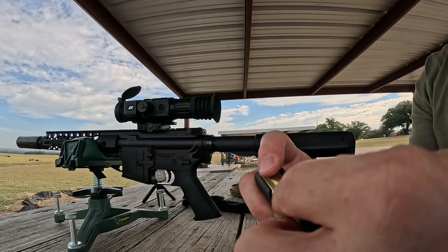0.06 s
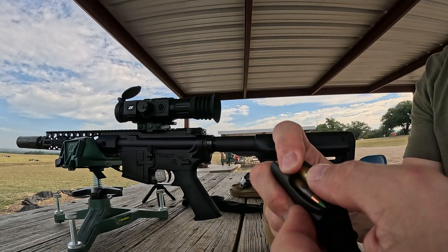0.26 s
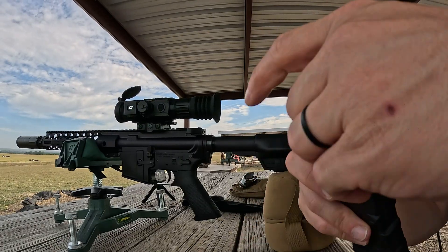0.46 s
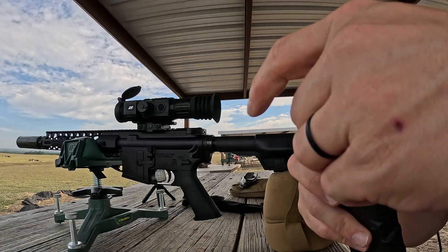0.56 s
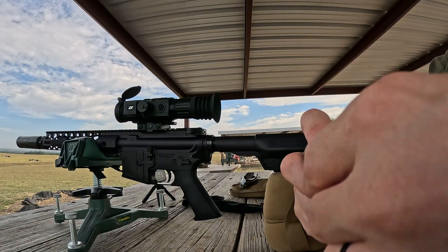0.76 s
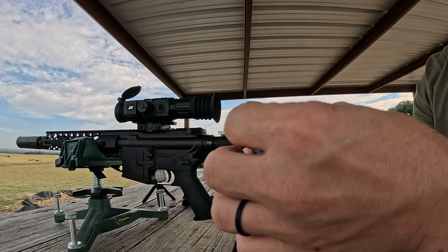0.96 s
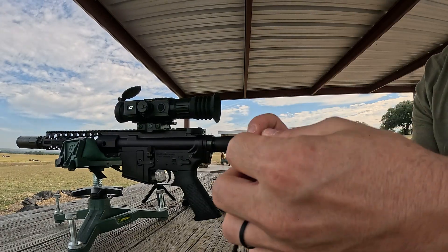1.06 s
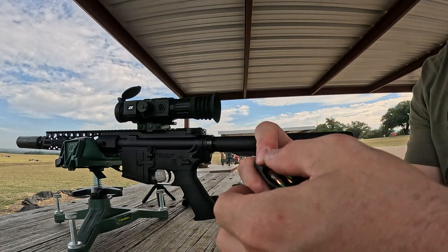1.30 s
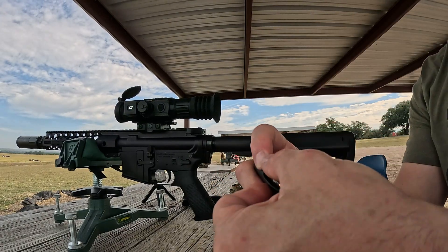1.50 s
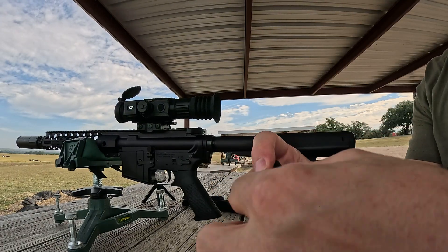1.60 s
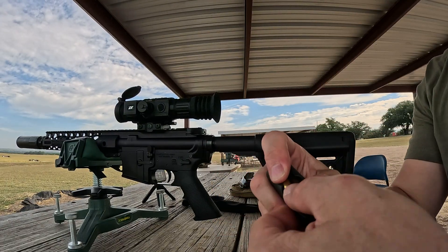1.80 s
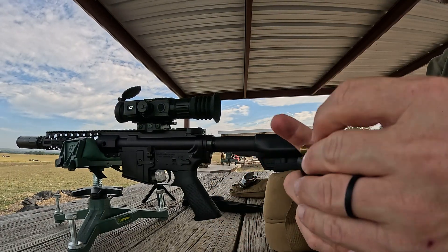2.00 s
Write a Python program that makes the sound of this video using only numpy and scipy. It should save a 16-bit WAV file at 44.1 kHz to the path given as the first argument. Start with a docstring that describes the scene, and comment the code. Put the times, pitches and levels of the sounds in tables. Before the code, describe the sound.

Sharp metal clicks as rounds are thumbed into a rifle magazine outdoors, up close.

```python
"""Under the roof of a shooting range, cartridges are thumbed into a rifle magazine near the microphone.
Each round clicks against the feed lips (the metal edges that hold it in), then snaps under them
and sets the spring and the stacked rounds rattling. Fingers rub on the magazine, and the roof
sends back a short tail of sound. Behind it is steady outdoor air, with a breeze that blows
on the microphone most strongly near the end."""
import sys
import numpy as np
from scipy import signal
from scipy.fft import rfft, irfft
from scipy.io import wavfile
from scipy.ndimage import uniform_filter1d

SR = 44100
rng = np.random.default_rng(int(sys.argv[2]) if len(sys.argv) > 2 else 0)


def file_out(sig):
    """Save sig as 16-bit WAV at sys.argv[1]."""
    # one column per channel
    cols = np.atleast_2d(sig).T
    # limit, then scale
    lim = np.clip(cols, -1, 1)
    pcm = np.round(lim * 32767).astype(np.int16)
    wavfile.write(sys.argv[1], SR, pcm)


N = 90404

# Brass touching the magazine. Bass, knock, treble and top turn parts of the tone up or down.
# (time [s], contact length [s], level [dB], bass [dB], knock [dB], treble [dB], top [dB], ring [dB])
BRASS_CLICKS = [ (.0368, 0.0015, -32, 12, 3, -18, -16, -5), (0.0426, 0.0029, -29.5, -6, -17, -15, -18, -7),
                (0.0566, .0005, -38.5, -17, -13, 7.5, 10, -5),
                (0.063, .001, -38.5, 13.5, 6.5, -8, -10, -16), (.1205, 0.00077, -52, -6, 17, -5, -4, -3),
                (0.1574, 0.0048, -40.5, 4, 8.5, 4, 8.5, -5), (0.164, .0005, -33.5, 1.5, -2, -20, -13, -12),
                (0.242, 0.00079, -16, -14, -3.5, -18, -1, -12), (0.2464, 0.0008, -26.5, -7, 10, 7, 5, -5),
                (0.2507, 0.0028, -16, -0.5, -7, 2.5, 3, -11), (0.257, 0.0018, -13, -4, 1.5, -10, -2, 3.5),
                (0.2873, 0.00072, -21, -24, -3, 5.5, 10, -1), (0.294, .001, -18.5, -22, -4, -5, 3, -3),
                (.3345, .001, -38, -17, -8, -10, -11, 12), (.428, .001, -23, 3.5, 0, 0.5, 2.5, -9),
                (.431, 0.00084, -15, -13, -6, -6, -7, -20), (0.4398, 0.0015, -14, -9, -2.5, -10, -4, -17),
                (0.4989, 0.0016, -14, -10.5, -3, 2, 0.5, 1), (.5073, 0.00073, -20.5, -16, 6, -12, -1, 0),
                (0.595, 0.00082, -36.5, -6, 8.5, -8, 7, 2),
                (0.611, 0.0025, -25.5, -2.5, -5, -2.5, -8.5, 0.5),
                (0.702, .001, -36, -17, 8.5, -11, -11, 4), (.7233, 0.0008, -32, -4, -3, -3.5, -5, 10.5),
                (0.749, 0.0031, -15.5, -0.5, -6, 6, 1.5, -25), (.756, 0.0065, -15, 0, 0, -1.5, -4, 4.5),
                (0.7663, 0.0013, -32.5, 11.5, 9, 10, 16, 6), (0.778, 0.00077, -33.5, -4, 5, 2, 8, -2),
                (0.998, 0.0012, -32, 4, 5.5, -6, -2, -34), (1.0638, 0.0013, -15.5, -5.5, -7, -8, -6, -0.5),
                (1.083, 0.0008, -18, -21, -8, 5.5, 5.5, 2), (1.109, 0.0011, -18, -9.5, -3.5, 5.5, 13, 9),
                (1.22, 0.0027, -43, 12.5, 0.5, -2, 5.5, -17),
                (1.2632, 0.0059, -26.5, -4.5, 2.5, -9, -13, -14),
                (1.319, 0.0045, -47.5, 13.5, 9, 3, 14, -9), (1.3602, 0.0039, -25, -2, 6.5, -4, -6, -16),
                (1.3664, .001, -18, -2.5, -2, -5, -4, -12), (1.371, 0.0023, -15.5, -7, 1, 3.5, 2, -6),
                (1.3763, 0.0014, -15, -6, 0, -14, 3, -10), (1.4135, 0.0011, -25, -14, -2, 4, 6, 1),
                (1.419, .001, -27.5, -14, 3, -2, 0, 5), (1.5364, 0.0011, -15, -16, -1.5, -10.5, -7, -18),
                (1.6, 0.00096, -36.5, -15, -26, -2, -3, -13), (1.729, 0.00072, -16.5, -3, -8, -5, -3, -5),
                (1.736, 0.0028, -19.5, 3.5, 1, 1.5, -3, -16), (1.9012, 0.0041, -40, 1, -4, -6, -4, 9),
                (1.9435, 0.0011, -51, -4, 4, 12.5, 20, -13)]
# A round snapping under the lips: the same columns as a click, followed by
# (rattle level [dB], rattle hold [s], rattle top [dB], case ring [dB])
ROUND_SNAPS = [ (.264, 0.0035, -8.5, -19.5, -2, 2.5, 9, 5, -16.5, 0.02, -3.5, -9.5),
               (0.7863, 0.0061, -9.5, -12, -6, 4.5, 8, -9, -18, 0.03, -5, -15),
               (1.3809, 0.0044, -11, -3, -1, 6.5, 11.5, 2, -19, 0.031, -3.5, -1.5),
               (1.7423, 0.0016, -13.5, -28, -15, 3, 0.5, 0, -21.5, 0.019, -9, -1)]
# Where the tone controls act: bass, knock, two points at the plain level, two for treble, top
TONE_POINTS_HZ = [500, 1050, 1900, 3100, 4700, 6000, 9500]
# Noise bands of a knock on the magazine. A fade time is how long a sound takes to drop by 60 dB.
# (frequency [Hz], level [dB], fade time [s])
BODY_BANDS = [(208, -30.5, 0.013), (329, -22, 0.038), (446, -4.5, 0.032), (643, -4, .02), (950, -4, 0.012),
              (1274, -8.5, 0.014), (1620, -15, 0.012), (2036, -7, 0.021), (2650, -8, 0.019),
              (3200, -8, 0.011), (3690, -17.5, 0.036), (5400, -4, 0.012), (5740, -11.5, 0.0063),
              (7470, -11.5, 0.014), (9260, -16, 0.012), (12900, -18, 0.0084), (16700, -35, 0.0073)]
# Tones the magazine and its spring ring with: (frequency [Hz], level [dB], fade time [s])
MAGAZINE_TONES = [(448, -14, .17), (820, -19, .15), (850, -19, .15), (970, -20, .11), (1179, -19, .13),
                  (1434, -21, .12), (1556, -19, .1), (1895, -17, .09), (1950, -18, .09), (2210, -20, .09),
                  (2400, -17, .08), (2520, -18, .08), (2860, -16, .07), (3000, -15, .07), (3300, -21, .07),
                  (5145, -15, .055), (6106, -21, .06)]
# Tones of a cartridge case: (frequency [Hz], level [dB], fade time [s])
CASE_TONES = [(1870, -5.5, 0.098), (1974, -2.5, 0.081), (2394, -8, 0.073), (2670, -14, 0.045),
              (3080, -8, 0.054), (3250, -16, 0.051), (4808, -4, 0.044), (5173, -7.5, 0.04),
              (6106, -25, 0.046)]
# Tone of the spring's rattle: (frequency [Hz], level [dB])
RATTLE_SPECTRUM = [(100, -29), (300, -7), (450, -6.5), (600, -23), (850, 3), (1100, -9), (1400, -1),
                   (1650, -2.5), (1950, 0), (2500, 6.5), (3100, -3.5), (3700, -1.5), (5100, -2), (7500, -1),
                   (13000, -6.5), (17000, -12)]
# How fast the rattle dies: (frequency [Hz], fade time [s])
RATTLE_FADES = [(300, 0.19), (2000, 0.13), (6000, 0.13), (14000, 0.076)]
# Loose rounds jingling as the stack settles: (time [s], ring level [dB], tick level [dB])
SETTLING_JINGLES = [(1.4305, -18.5, -23), (1.44, -31, -44), (1.45, -27, -33.5), (1.46, -30, -40),
                    (1.4665, -25, -34), (1.5025, -29.5, -40)]
# The tick in each jingle: a short burst of noise that starts fading at once.
# (contact length [s], bass [dB], knock [dB], treble [dB], top [dB], ring [dB])
TICK_SHAPE = [-0.27, -21, 0, -0.5, -4, 6.5]
# A case rim catching on a lip: (time [s], frequency [Hz], level [dB])
RIM_CHINKS = [(.4407, 2460, -12.5), (0.4994, 5150, -9), (0.7874, 5360, -5), (1.0643, 2950, -6.5),
              (1.083, 5740, -6), (1.1096, 5540, -10)]
# The feed lips ringing after a strike: (frequency [Hz], level [dB], fade time [s])
PING_TONES = [(1160, -30, 0.26), (1563, -26, 0.092), (2525, -36, .1), (3020, -36, 0.079),
              (3760, -33.5, 0.1)]
# The spring humming at the start: (frequency [Hz], level [dB], fade time [s])
SPRING_HUM = [(402, -39.5, 0.71)]
# Fingers and brass sliding: (time [s], length [s], level [dB], tilt toward treble [dB])
RUB_STROKES = [(0, 0.076, -38.5, -7.5), (0.407, 0.027, -36, -1), (0.563, 0.14, -48, -7),
               (0.96, 0.041, -36, 0.5), (1.186, 0.047, -43, 5.5), (1.621, 0.093, -42.5, -2),
               (1.717, 0.027, -24.5, -3.5), (1.885, 0.16, -48.5, 0)]
# Tone of the sliding: (frequency [Hz], level [dB])
RUB_SPECTRUM = [(100, -25), (450, 4), (1200, -5), (2300, 2), (3500, -6), (5500, -1), (7500, 0.5),
                (9500, -9), (12000, -9.5), (17000, -15)]
# Tone of the tail under the roof: (frequency [Hz], level [dB])
ROOF_SPECTRUM = [(150, 2), (500, -16), (1500, -14.5), (3000, -15), (6000, -19.5), (12000, -18.5)]
# How fast the early part of that tail dies: (frequency [Hz], fade time [s])
ROOF_FADES = [(200, 0.38), (1000, 0.16), (3000, 0.066), (7000, 0.11), (15000, 0.12)]
# Echoes off the bench, the person's body and, last, the roof: (delay [s], level [dB])
NEAR_ECHOES = [(.0062, -32.5), (.0088, -19), (0.0126, -21)]
# Tone of the open air and microphone hiss: (frequency [Hz], level [dB])
AIR_SPECTRUM = [(20, -2), (60, 2), (150, -4), (250, -10.5), (450, -6.5), (800, -15), (1500, -21.5),
                (3000, -27), (6000, -27.5), (9000, -29), (10500, -15), (11600, -36), (16000, -33)]
# Tone of the breeze on the microphone: (frequency [Hz], level [dB])
BREEZE_SPECTRUM = [(15, -21.5), (45, 0), (90, -0.5), (170, -3.5), (260, -13), (450, -24.5), (1000, -34),
                   (4000, -70)]
# How the breeze rises and falls: (time [s], level [dB])
BREEZE_LEVELS = [(0, -43), (.1, -56), (.25, -45), (.48, -56), (.56, -41.5), (.67, -38.5), (.73, -51),
                 (.85, -44.5), (.93, -50), (1.2, -47.5), (1.615, -47), (1.645, -34.5), (1.72, -29.5),
                 (1.8, -34), (1.875, -39.5), (1.898, -25), (1.93, -38.5), (1.957, -25), (1.99, -37),
                 (2.04, -33)]


def magazine(ping_time_s=.508):
    """Rounds are pushed in one by one: they click, snap under the lips, rattle and settle."""
    out = np.zeros(N)
    for start, *blow in BRASS_CLICKS:
        add(out, start, contact(*blow))
    for start, *blow, rattle_db, hold_s, top_db, case_db in ROUND_SNAPS:
        add(out, start, contact(*blow) + rattle(rattle_db, hold_s, top_db, case_db))
    for start, ring_db, tick_db in SETTLING_JINGLES:
        tick = contact(TICK_SHAPE[0], tick_db, *TICK_SHAPE[1:])
        add(out, start, tick + gain(ring_db) * ring(CASE_TONES))
    for start, hz, level_db in RIM_CHINKS:
        add(out, start, chink(hz, level_db))
    add(out, ping_time_s, ring(PING_TONES))
    add(out, 0, ring(SPRING_HUM, size=SR))
    for start, *stroke in RUB_STROKES:
        add(out, start, rub(*stroke))
    return out


def contact(length_s, level_db, bass_db, knock_db, treble_db, top_db, ring_db, attack_s=0.00029):
    """Brass hits the magazine: a short, grating burst of noise, then a thin ring."""
    t = np.arange(2048) / SR
    hz, band_db, fade_s = np.transpose(BODY_BANDS)
    tone_db = level_db + np.array([bass_db, knock_db, 0, 0, treble_db, treble_db, top_db])
    colour = list(zip(TONE_POINTS_HZ, tone_db))
    bands = split_bands(rng.standard_normal(len(t)), hz)
    bands *= gain(-60 * np.maximum(t - length_s, 0) / fade_s[:, None])
    bands *= 1 - np.exp(-t / (attack_s + 0.57 / hz[:, None]))  # low bands start more slowly
    bands /= np.sqrt((bands ** 2).sum(1, keepdims=True) / (.005 * SR))  # same energy in each band
    out = gain(ring_db) * ring(MAGAZINE_TONES, colour)
    add(out, 0, gain(band_db + value_at(colour, hz)) @ bands)
    return out


def ring(tones, colour=((1, 0),), size=SR // 3, spread_db=3, detune=.015, rise_s=0.00067):
    """Struck metal rings in fading tones. The spot hit varies their strength, the grip their pitch."""
    t = np.arange(size) / SR
    out = np.zeros(size)
    for hz, db, fade_s in tones:
        spot, grip, phase = rng.uniform(-1, 1, 3)
        loudness = gain(db + value_at(colour, hz) + spread_db * spot - 60 * t / fade_s)
        out += loudness * np.sin(2 * np.pi * hz * (1 + detune * grip) * t + np.pi * phase)
    return out * (1 - np.exp(-t / rise_s))


def rattle(level_db, hold_s, top_db, case_db, rounds=5, hits_per_s=9000, spread_db=2, rise_s=0.0075):
    """The spring and stacked rounds make many tiny collisions that swell, hold and die away."""
    size = SR // 3
    t = np.arange(size) / SR
    shape = (rounds, size)  # one row of hits for each round
    hits = (rng.random(shape) < hits_per_s / rounds / SR) * rng.choice([-1, 1], shape)
    hits = hits * gain(spread_db * rng.exponential(1, shape))
    spring = normalise(filtered(hits.sum(0), RATTLE_SPECTRUM))
    spring = filtered(spring, [(4000, 0), (12000, top_db)])
    cases = sum(irfft(rfft(row) * rfft(ring(CASE_TONES)), size) for row in hits)  # each hit rings a case
    sound = spring + gain(case_db) * normalise(cases)
    hz, fade_s = np.transpose(RATTLE_FADES)
    fade = gain(level_db - 60 * np.maximum(t - hold_s, 0) / fade_s[:, None])
    return (split_bands(sound, hz) * fade).sum(0) * np.minimum(t / rise_s, 1)


def chink(hz, level_db, fade_s=.022, rise_s=.0005):
    """A rim catches on a lip and sounds one tone, which dies fast because the case is gripped."""
    t = np.arange(4096) / SR
    loudness = gain(level_db - 60 * t / fade_s) * (1 - np.exp(-t / rise_s))
    return loudness * np.sin(2 * np.pi * hz * t)


def rub(length_s, level_db, tilt_db, grain_db=2.2):
    """Sliding fingers and brass make a grainy hiss that rises and falls in one smooth stroke."""
    size = 8192
    t = np.arange(size) / SR
    grain = gain(grain_db * normalise(uniform_filter1d(rng.standard_normal(size), size=60)))
    hiss = filtered(rng.standard_normal(size) * grain, RUB_SPECTRUM)
    hiss = filtered(hiss, [(1500, -tilt_db), (8000, tilt_db)])
    stroke = np.sin(np.pi * np.minimum(t / length_s, 1))
    return gain(level_db) * normalise(hiss) * stroke


def roof_echoes(sound, tail_delay_s=.005, late_db=-14.5, late_fade_s=0.43):
    """Sound bounces off the bench, the person and the roof, and leaves a short tail under the roof."""
    t = np.arange(SR // 2) / SR
    hz, fade_s = np.transpose(ROOF_FADES)
    fade = gain(-60 * t / fade_s[:, None]) + gain(late_db - 60 * t / late_fade_s)
    fade /= np.linalg.norm(fade, axis=1, keepdims=True)
    noise = filtered(rng.standard_normal(len(t)), ROOF_SPECTRUM)
    tail = (split_bands(noise, hz) * fade).sum(0)
    response = np.zeros(SR)
    add(response, tail_delay_s, tail)
    for delay, db in NEAR_ECHOES:
        add(response, delay, gain([db]))
    return signal.fftconvolve(sound, response)[:N]


def air_and_breeze(air_db=-44):
    """The open air hisses steadily while gusts rumble on the microphone."""
    air = gain(air_db) * normalise(filtered(rng.standard_normal(N), AIR_SPECTRUM))
    gusts = gain(np.interp(np.arange(N) / SR, *np.transpose(BREEZE_LEVELS)))
    rumble = normalise(filtered(rng.standard_normal(N), BREEZE_SPECTRUM))
    return air + gusts * rumble


def gain(db):
    """Turns decibels into a number to multiply by."""
    return 10 ** (np.asarray(db) / 20)


def normalise(sound):
    """Scales a sound so that its average strength (rms) is 1."""
    return sound / np.sqrt(np.mean(sound ** 2) + 1e-20)


def value_at(points, hz):
    """Looks up a value between a table's rows, spacing frequencies by octaves."""
    row_hz, values = np.transpose(points)
    return np.interp(np.log(hz + 1), np.log(row_hz + 1), values)


def add(mix, start_s, sound):
    """Mixes a sound in at the given time."""
    part = mix[max(round(start_s * SR), 0):][:len(sound)]
    part += sound[:len(part)]


def filtered(sound, spectrum):
    """Turns each frequency up or down by the decibels in a table."""
    hz = np.fft.rfftfreq(len(sound), 1 / SR)
    return irfft(rfft(sound) * gain(value_at(spectrum, hz)), len(sound))


def split_bands(sound, centres_hz):
    """Splits a sound into overlapping frequency bands that add up to the whole."""
    hz = np.fft.rfftfreq(len(sound), 1 / SR)
    spectrum = rfft(sound)
    shares = [value_at(list(zip(centres_hz, row)), hz) for row in np.eye(len(centres_hz))]
    return np.array([irfft(spectrum * share, len(sound)) for share in shares])


def scene():
    """The magazine, its echoes and the outdoor air, in one channel."""
    near = magazine()
    return (near + roof_echoes(near) + air_and_breeze())[None]


def record(dry, drive_db=-0.5, ceiling=.85, knee=6, cutoff_hz=16300):
    """The loudest snaps are gently squashed, then the highest treble is cut off."""
    driven = dry * gain(drive_db)
    squashed = driven / (1 + abs(driven / ceiling) ** knee) ** (1 / knee)
    low_pass = signal.firwin(255, cutoff_hz, window=("kaiser", 9), fs=SR)
    return signal.oaconvolve(squashed, low_pass[None], "same")


dry = scene()
out = record(dry)
file_out(out)
```